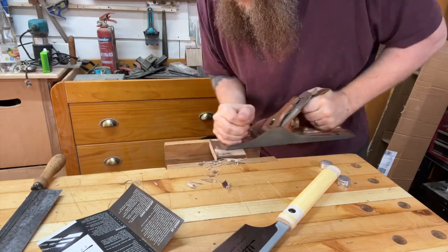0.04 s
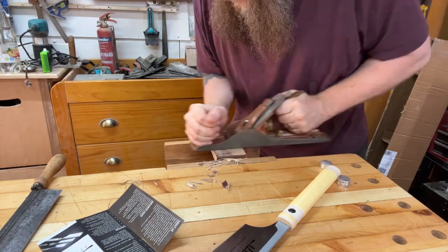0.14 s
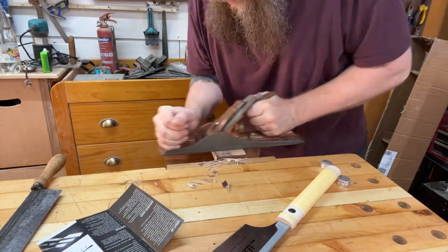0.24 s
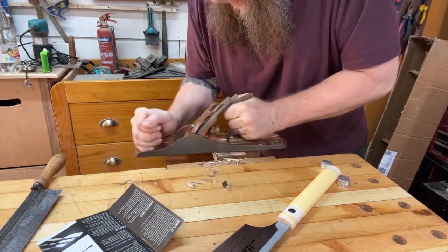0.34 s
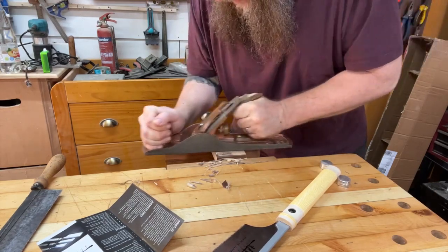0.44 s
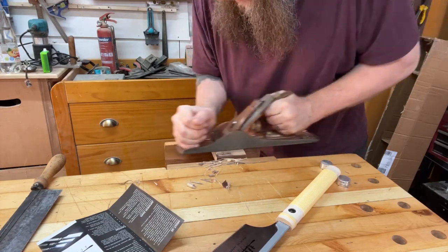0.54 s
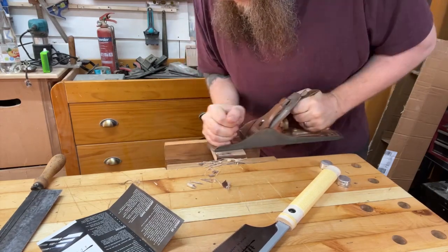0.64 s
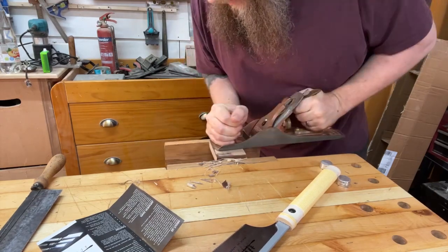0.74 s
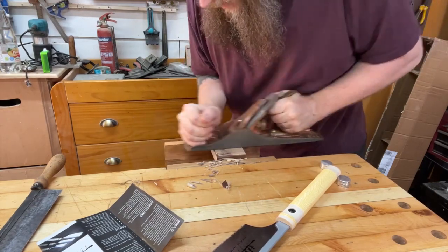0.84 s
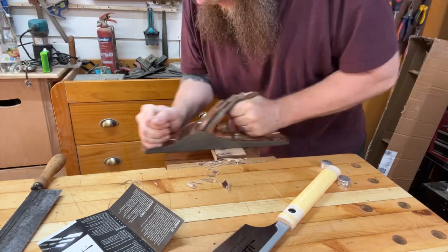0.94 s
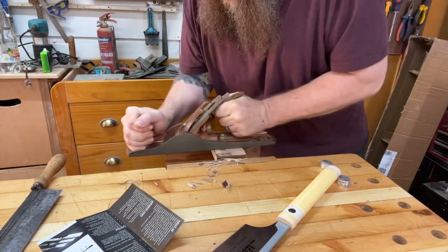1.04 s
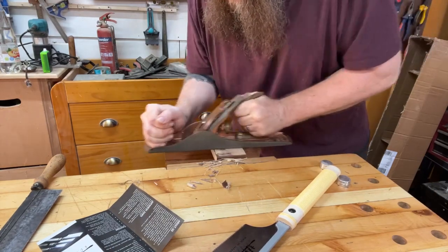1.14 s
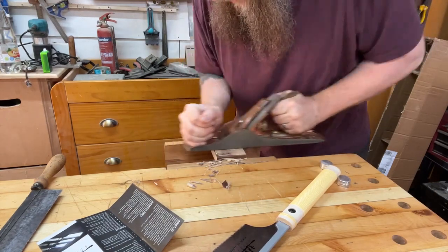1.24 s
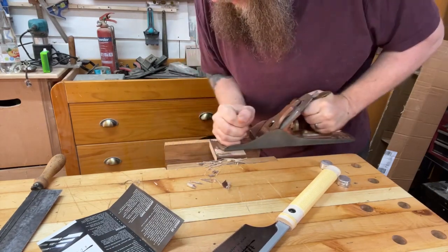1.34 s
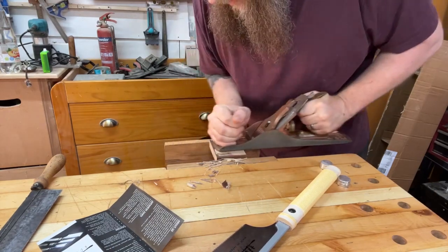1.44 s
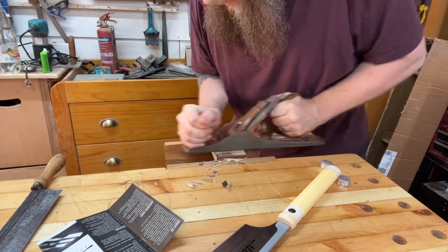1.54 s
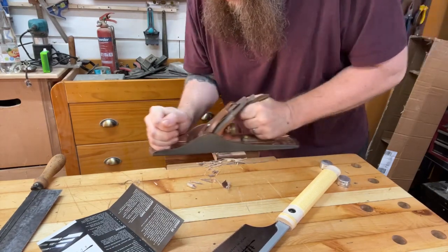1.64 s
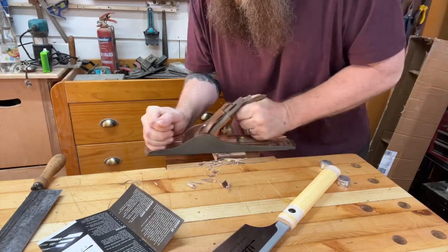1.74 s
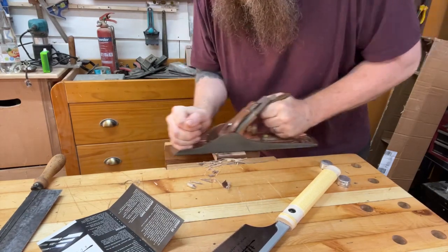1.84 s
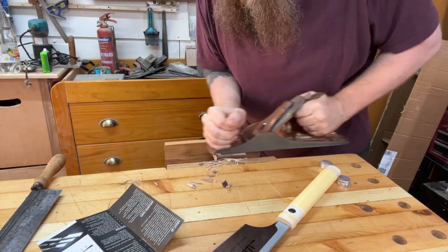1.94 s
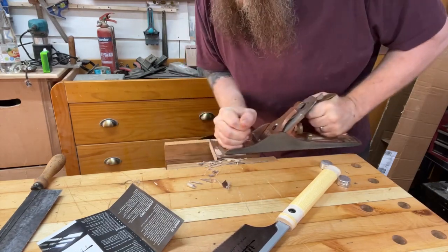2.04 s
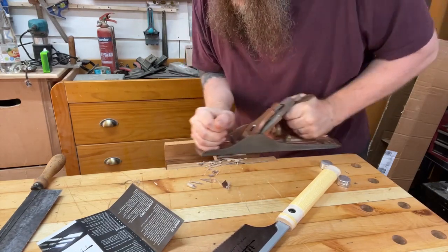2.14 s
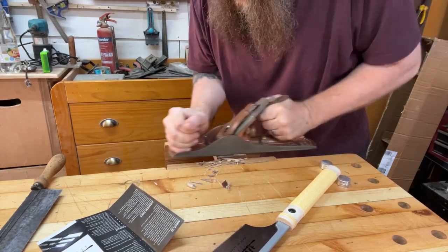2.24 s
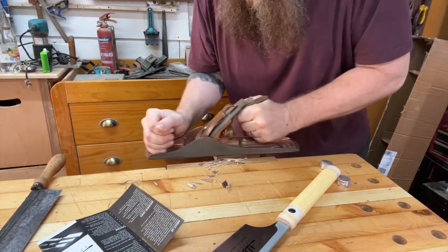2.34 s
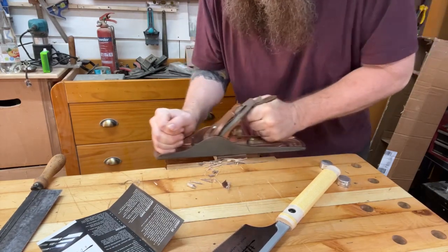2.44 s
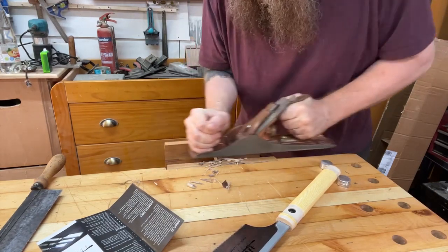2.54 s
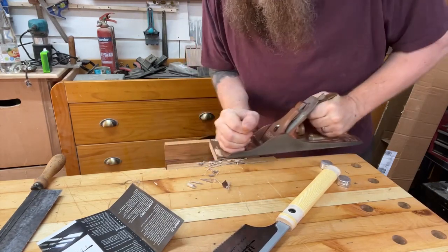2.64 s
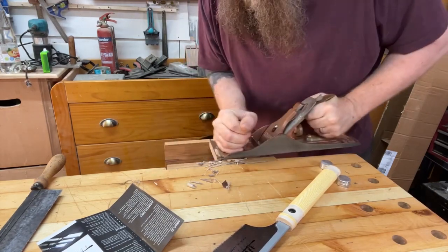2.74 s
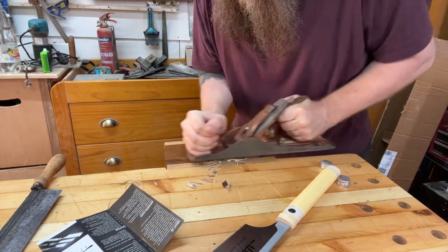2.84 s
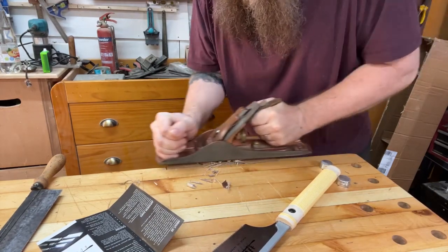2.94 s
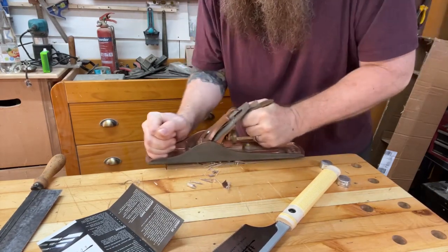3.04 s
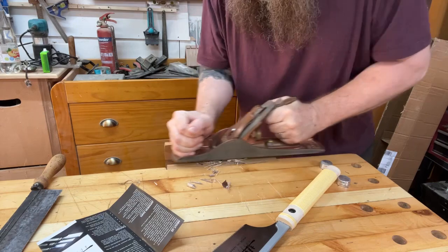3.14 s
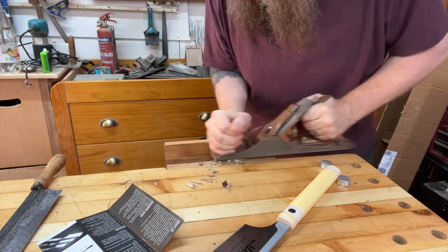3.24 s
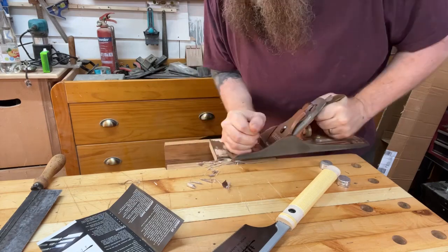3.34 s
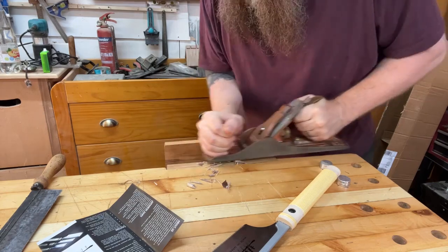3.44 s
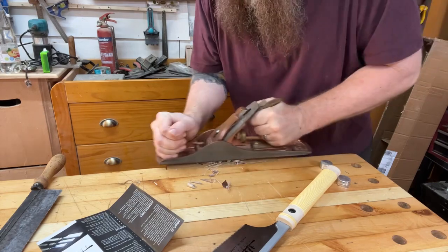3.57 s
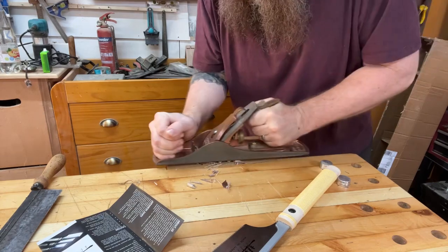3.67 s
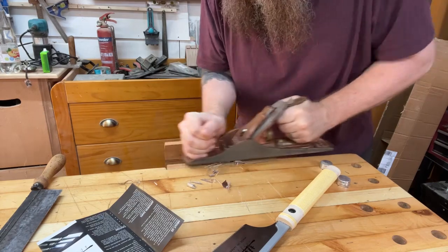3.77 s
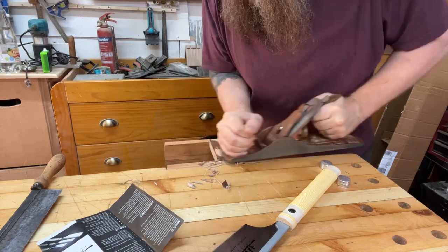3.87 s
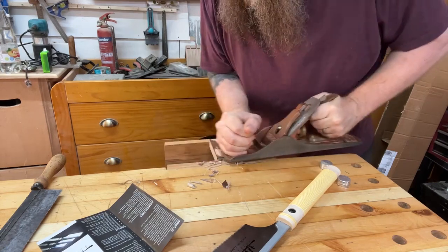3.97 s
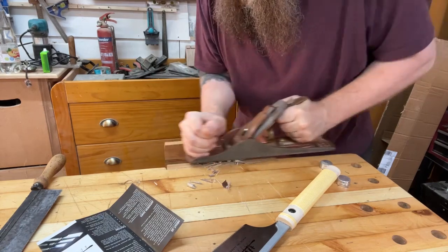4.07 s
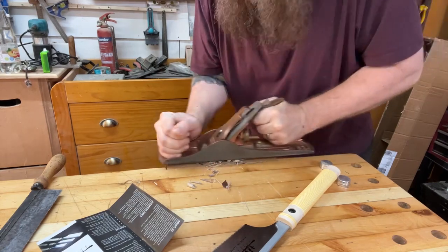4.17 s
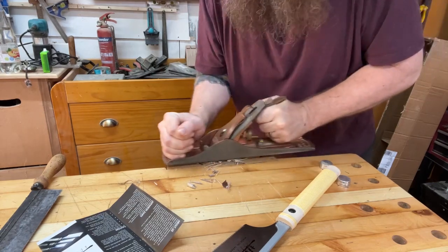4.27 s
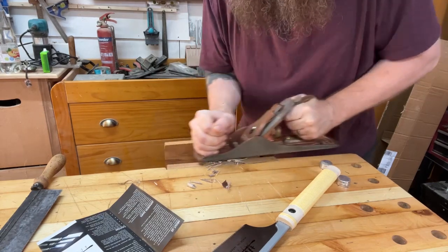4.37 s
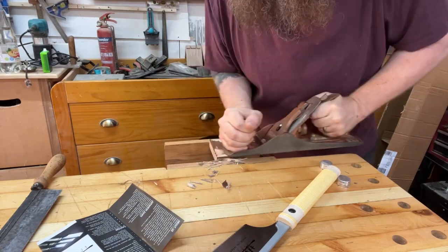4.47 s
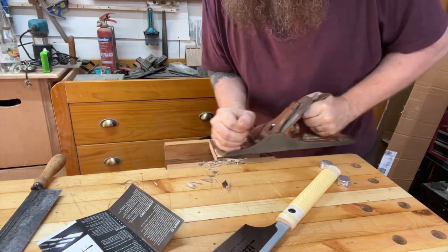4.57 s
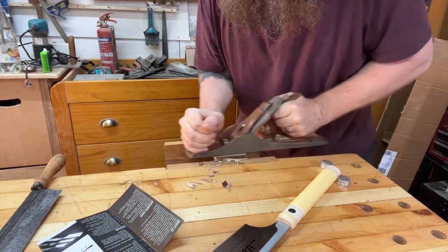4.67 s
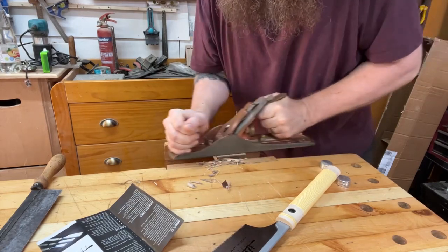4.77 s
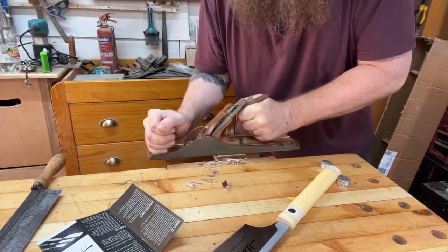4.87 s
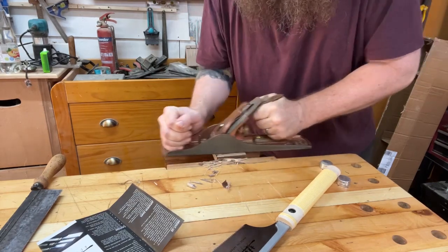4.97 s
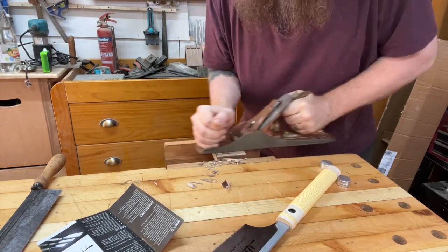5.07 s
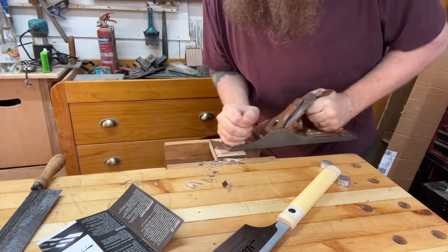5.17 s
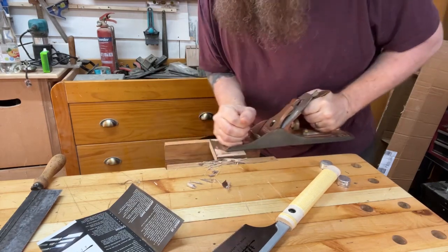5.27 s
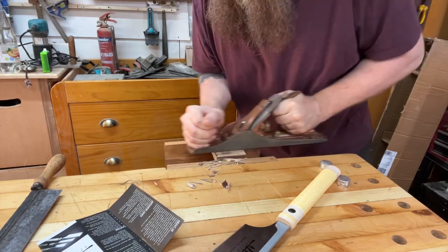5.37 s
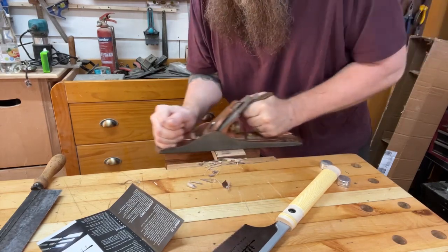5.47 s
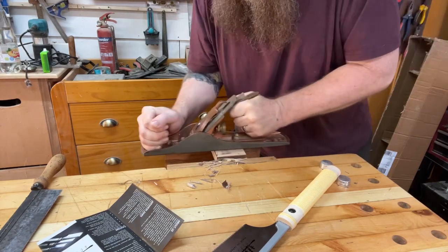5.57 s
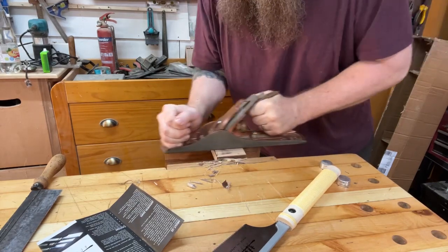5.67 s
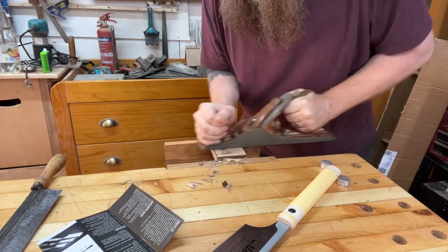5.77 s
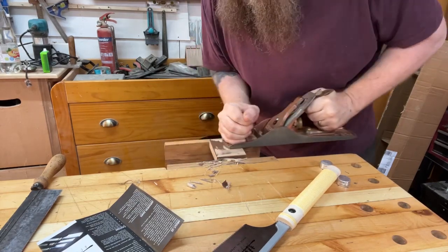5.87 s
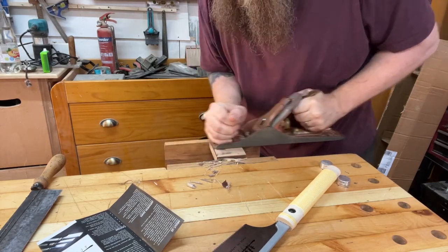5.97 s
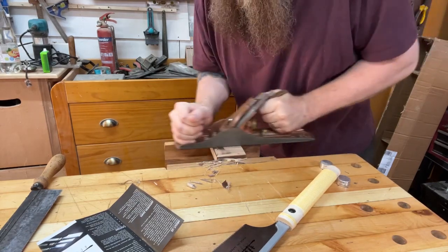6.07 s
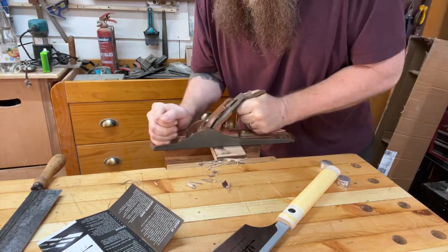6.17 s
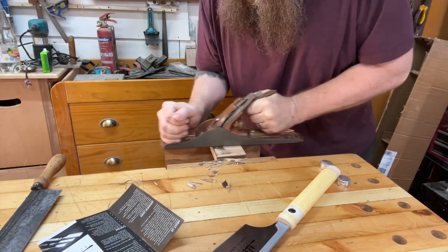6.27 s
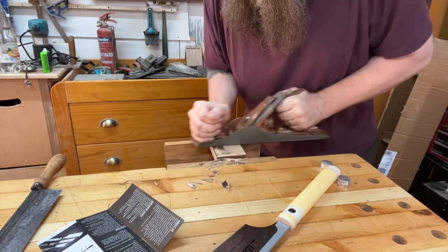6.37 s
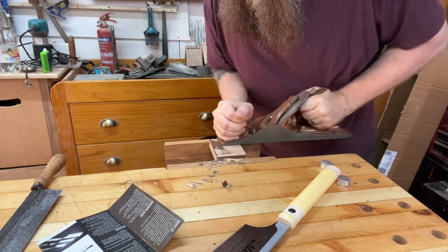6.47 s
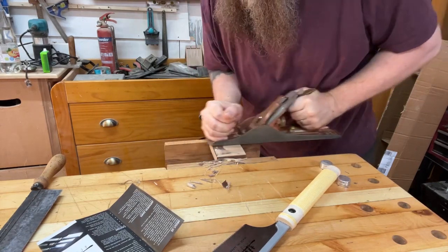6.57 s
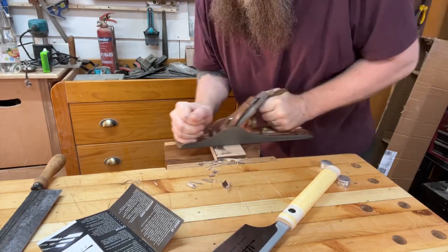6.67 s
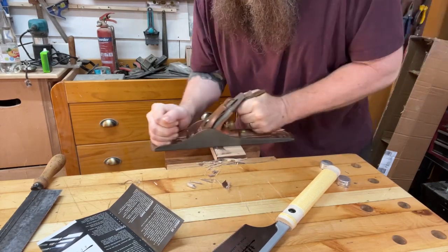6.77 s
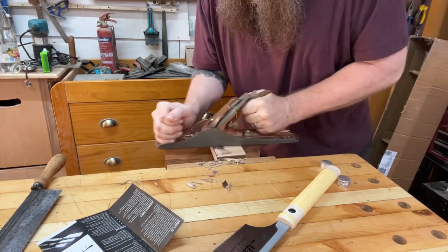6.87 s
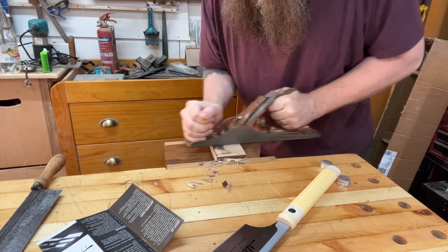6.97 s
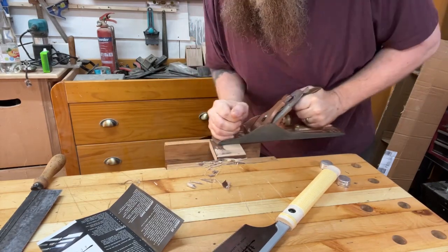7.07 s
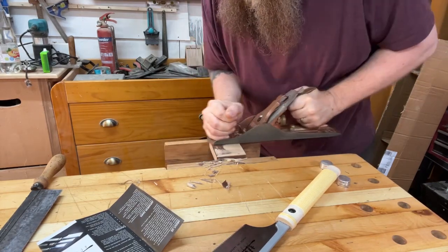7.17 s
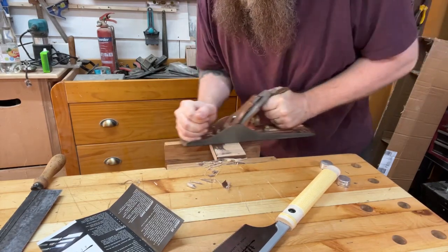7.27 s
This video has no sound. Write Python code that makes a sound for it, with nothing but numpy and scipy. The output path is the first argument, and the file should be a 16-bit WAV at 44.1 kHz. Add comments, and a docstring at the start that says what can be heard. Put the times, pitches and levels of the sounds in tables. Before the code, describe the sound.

A long iron hand plane makes twelve quick strokes over a small wooden block, each a knocking bite and short scrape, with softer return drags.

```python
"""After a dull knock, a long iron hand plane starts twelve quick pushes over a wooden block on a workshop bench.
Each push opens with a blow (noise and a click ringing plane and wood) and tears a shaving (chattering noise).
Each return catches lightly, drags back (softer, drifting noise) and bumps off the edge; the fourth push is hardest,
with a slap after it, and a loud dry tick snaps in the last push. Throughout, the sole slides as coloured noise,
the bench knocks (decaying sines) and rumbles, a small room answers the block and bench, and still air hums low."""
import sys
import numpy as np
from scipy import signal
from scipy.fft import rfft, irfft
from scipy.io import wavfile
from scipy.ndimage import uniform_filter1d, map_coordinates

SR = 44100
rng = np.random.default_rng(int(sys.argv[2]) if len(sys.argv) > 2 else 0)


def dump(signal):
    """Clip the signal to [-1, 1] and save it as 16-bit WAV at the path in sys.argv[1]."""
    limited = np.clip(np.atleast_2d(signal).T, -1, 1)
    pcm = np.round(limited * 32767).astype(np.int16)
    wavfile.write(sys.argv[1], SR, pcm)


N = 322415  # length in samples
TIME = np.arange(N) / SR


def amp(db):
    """Decibels to gain."""
    return 10 ** (np.asarray(db) / 20)


def evened(x):
    """Scales to an rms of one."""
    return x / np.sqrt(np.mean(x ** 2) + 1e-20)


def read(points, hz):
    """Reads a table on a log-frequency axis."""
    f, value = np.transpose(points)
    return np.interp(np.log(hz + 1), np.log(f + 1), value)


def level(points):
    """Gain over the whole scene, gliding in dB between the points of a table."""
    return amp(np.interp(TIME, *np.transpose(points)))


def add(mix, s, sound):
    """Mixes a sound in at time s."""
    part = mix[max(round(s * SR), 0):][:len(sound)]
    part += sound[:len(part)]


def band(x, lo_hz, hi_hz):
    """Causal band-pass."""
    edges = [lo_hz, min(hi_hz, SR / 2 - 1)]
    return signal.sosfilt(signal.butter(N=3, Wn=edges, btype="band", fs=SR, output="sos"), x)


def colour(x, tone, modes=(), size=8192):
    """Passes x through a causal body: a broad spectrum with ringing modes on top."""
    hz = np.fft.rfftfreq(size, 1 / SR)
    ring = 1 + sum(amp(db) / (1 + 2j * (hz - f) / width) for f, width, db in modes)
    log_gain = np.log(amp(read(tone, hz)) * abs(ring))
    circle = np.concatenate([log_gain, log_gain[-2:0:-1]])
    spectrum = np.exp(np.conj(signal.hilbert(circle)))  # minimum phase: the body answers at once
    taps = np.fft.ifft(spectrum).real[:size // 2]
    return signal.oaconvolve(x, taps)[:len(x)]


def wander(rate_hz, count=N):
    """Smooth chance of rms one, changing mostly below the given rate."""
    hz = np.fft.rfftfreq(count, 1 / SR)
    spectrum = rfft(rng.standard_normal(count)) * np.exp(-(hz / rate_hz) ** 2)
    return evened(irfft(spectrum, count))


def grit(grain_db, grain_hz):
    """Friction force: noise that comes in tiny clumps as fibres catch and let go."""
    return evened(rng.standard_normal(N) * amp(grain_db * wander(grain_hz)))


FIRST_TURN_S, LAST_TURN_S = -0.033, 7.64


def turn_times():
    """Between these two, the plane turns round halfway between leaving the block and meeting it again."""
    strokes = sorted(PUSHES + RETURNS)
    halfway = [(last[1] + following[0]) / 2 for last, following in zip(strokes, strokes[1:])]
    return [FIRST_TURN_S, *halfway, LAST_TURN_S]


SWEEP_FALL_OCTAVES = .14  # the block's pitch sinks as the plane passes over it


def travel():
    """Speed of the plane (0 at each turn, 1 mid-sweep) and the pitch of the block, sinking through each stroke."""
    turns = turn_times()
    progress = np.interp(TIME, turns, np.arange(len(turns)))
    pitches = np.array([stroke[-1] for stroke in sorted(PUSHES + RETURNS)])
    hz = pitches[np.minimum(progress.astype(int), len(pitches) - 1)]
    speed = abs(np.sin(np.pi * progress))
    return speed, hz * 2 ** (SWEEP_FALL_OCTAVES * (.5 - progress % 1))


def hollow(x, lift_db, width_hz, ratio=1, glide=0.18):
    """Adds a resonance of sole and block that shifts with the travel of the plane."""
    speed, hz = travel()
    mode_hz = ratio * hz * (1 + glide * (speed - .8))
    spin = np.exp(2j * np.pi * np.cumsum(mode_hz) / SR)
    r = np.exp(-np.pi * width_hz / SR)
    # bring the moving mode down to zero, smooth there, and move it back up
    resonance = 2 * (spin * signal.lfilter([1 - r], [1, -r], x / spin)).real
    return evened(x + amp(lift_db) * resonance)


def shifting(x, patchy_db, size=(7, 25)):
    """The colour of a rub drifts as the point of contact moves over the grain."""
    z = signal.stft(x, nperseg=512, noverlap=384)[2]
    patches = uniform_filter1d(rng.standard_normal(z.shape), size[0], 0)  # smooth across pitch
    patches = uniform_filter1d(patches, size[1], 1)  # and across time
    z = z * amp(patchy_db * evened(patches))
    return evened(signal.istft(z, nperseg=512, noverlap=384)[1][:N])


def scrape(strokes, sound, rasp_change_db, hiss_change_db, rise_s, fall_s, uneven_db):
    """Plays a friction sound while the blade is on the block; its rasp and hiss change steadily across it."""
    rasp, hiss = np.zeros(N), np.zeros(N)
    for start, end, rasp_db, hiss_db in strokes:
        t = np.arange(start - rise_s, end + .06, 1 / SR)
        landing = np.interp(t, [start - rise_s, start + rise_s], [0, 1]) ** 2
        contact = landing * np.exp(-np.maximum(t - end, 0) / fall_s)
        across = np.interp(t, [start, end], [0, 1])
        add(rasp, t[0], contact * amp(rasp_db + rasp_change_db * across))
        add(hiss, t[0], contact * amp(hiss_db + hiss_change_db * across))
    grain = evened(amp(uneven_db * wander(62)))  # hard and soft wood pass under the edge
    return grain * (rasp * evened(band(sound, 56, 3900)) + hiss * evened(band(sound, 4120, 16000)))


# spectrum of the still air: (frequency_hz, relative_level_db)
AIR_TONE = [(15, 0.5), (40, 5), (80, -1.5), (150, -6), (300, -9), (1000, -10.5), (2000, -11.5),
            (4000, -23.5), (8000, -30.5), (16000, -42.5)]


def still_air():
    """Steady noise, strongest in the bass."""
    return amp(-58.5) * evened(colour(rng.standard_normal(N), AIR_TONE))


# decay of the room's tail: (frequency_hz, t60_s)
ROOM = [(100, 0.49), (300, 1), (1000, 0.19), (2000, 0.31), (6000, 0.053), (15000, 0.21)]


def room(x, delay_s=.003, early_db=-11, early_s=0.0019, count=32768):
    """A quick scatter off the bench top, then the short tail of the workshop."""
    t = np.arange(count) / SR
    sparse = rng.random(count) < 4000 / SR  # about 4000 echoes per second
    taps = rng.choice([-1., 1.], count) * sparse * (t > delay_s)
    hz, when, z = signal.stft(taps, SR, nperseg=256)
    decay = amp(-60 * when / read(ROOM, hz)[:, None])
    tail = signal.istft(z * decay, SR, nperseg=256)[1][:count]
    early = taps * np.exp(-t / early_s)
    answer = amp(-12.5) * tail / np.linalg.norm(tail) + amp(early_db) * early / np.linalg.norm(early)
    return x + signal.fftconvolve(x, answer)[:N]


# the louder dull knocks of the bench and the grip: (start_s, level_db, pitch_hz)
KNOCKS = [(.008, -37.5, 354), (.362, -38, 257), (0.611, -38.5, 280), (1.27, -38, 291), (1.573, -37, 244),
          (2.243, -28, 217), (2.678, -41, 636), (3.322, -40.5, 744), (3.465, -49, 743), (3.914, -42, 722),
          (4.086, -28, 738), (4.639, -30, 220), (5.03, -34, 598), (6.005, -25, 251), (7.102, -41, 273),
          (7.233, -27, 287)]
# deep thumps of the bench as it takes the weight: (start_s, level_db)
THUMPS = [(0.678, -47.5), (2.25, -44), (2.919, -46.5), (3.246, -46), (6.427, -32.5), (7.065, -40.5)]
# shavings snapping: (start_s, level_db)
TICKS = [(.175, -24.5), (.3254, -48), (2.311, -48.5), (3.056, -48.5), (3.301, -49.5), (4.30, -55),
         (4.114, -36), (4.364, -41), (4.8104, -50.5), (6.1805, -50.5), (7.2721, -16.5)]
# spectrum of the bench wood, in its knocks and its rumble: (frequency_hz, relative_level_db)
RUMBLE_TONE = [(80, -15), (160, -2.5), (255, 8), (450, -5.5), (630, 1), (900, -4.5), (1500, -18),
               (4000, -40.5), (14000, -62.5)]
# the grip shifts with a faint knock at every turn-round, its pitch scattered around TURN_KNOCK_HZ
TURN_KNOCK_DB, TURN_KNOCK_HZ, TURN_SPREAD_OCTAVES, TURN_LEAD_S = -46.5, 316, 1, .012
BLOW_THUMP_DB, BLOW_THUMP_LEAD_S = -15.5, 0.0035  # every blow also sways the bench; relative to the blow


def bench(knock_s=0.011, rattle=0.74, thump_hz=39, thump_s=0.014, tick_s=0.0022, size=8192):
    """Knocks are decaying sines with wooden noise, thumps swelling low sines, ticks bursts of bright noise."""
    out, t = np.zeros(N), np.arange(size) / SR
    turn_knocks = []
    for s in turn_times()[1:-1]:
        hz = TURN_KNOCK_HZ * 2 ** (TURN_SPREAD_OCTAVES * rng.standard_normal())
        turn_knocks.append((s - TURN_LEAD_S, TURN_KNOCK_DB, hz))
    blow_thumps = [(s - BLOW_THUMP_LEAD_S, db + BLOW_THUMP_DB) for s, _, db, *_ in PUSHES]
    knock_shape = np.exp(-t / knock_s) * (1 - np.exp(-t / 0.0043))
    thump_shape = (t / thump_s) ** 2 * np.exp(2 * (1 - t / thump_s))  # swells, full at thump_s
    for s, db, hz in KNOCKS + turn_knocks:
        wood = evened(colour(rng.standard_normal(size), RUMBLE_TONE))
        add(out, s, amp(db) * (np.sin(2 * np.pi * hz * t) + rattle * wood) * knock_shape)
    for s, db in THUMPS + blow_thumps:
        hz = thump_hz * rng.uniform(0.75, 1.1)  # no two thumps alike
        sway = np.sin(2 * np.pi * hz * t) + 0.37 * evened(band(rng.standard_normal(size), 23, 83.0))
        add(out, s, amp(db) * sway * thump_shape)
    for s, db in TICKS:
        snap = evened(band(rng.standard_normal(size), 2400, 11000))
        add(out, s, amp(db) * snap * np.exp(-t / tick_s))
    return out


# how hard the sole bears on the wood, as the level of its rub: (time_s, level_db)
BEARING = [(0, -46.5), (1, -56.5), (2.3, -44.5), (3.2, -48), (4.2, -50.5), (4.8, -54), (5.7, -54),
           (6.2, -48), (6.9, -54.5), (7.3, -42.5)]
# level of the sole's hiss: (time_s, level_db)
SOLE_HISS = [(0, -57), (1.3, -57.5), (2.3, -56.5), (3.3, -60), (4.3, -59), (5.9, -58), (6.9, -60.5),
             (7.3, -53)]
# level of the bench's rumble: (time_s, level_db)
RUMBLE = [(0, -52.5), (2.2, -60), (2.8, -60.5), (3.6, -69), (4.6, -58), (7.3, -56.5)]
# spectra of the sole's rub and hiss: (frequency_hz, relative_level_db)
RUB_TONE = [(500, -28.5), (1100, -7), (1600, 2), (2300, -0.5), (3000, -6), (3800, -3.5), (4500, -29),
            (6000, -25)]
HISS_TONE = [(3000, -1), (4500, -0.5), (6600, 4.5), (8500, -6.5), (12000, -13), (16000, -75)]


def sole(rub_power=0.78, hiss_power=1.14):
    """Iron slides on wood, louder with speed and still at each turn; the bench rumbles underneath."""
    speed, _ = travel()
    rub = hollow(colour(grit(grain_db=1.5, grain_hz=120), RUB_TONE), lift_db=6.5, width_hz=170)
    rub = hollow(rub, lift_db=1.5, width_hz=160, ratio=1.3, glide=0.18)  # a higher mode glides further in Hz
    hiss = colour(grit(grain_db=2, grain_hz=291), HISS_TONE)
    rumble = evened(colour(grit(grain_db=4.0, grain_hz=35), RUMBLE_TONE))
    slide = level(BEARING) * shifting(rub, patchy_db=5.0) * speed ** rub_power
    slide += level(SOLE_HISS) * shifting(hiss, patchy_db=1.5) * speed ** hiss_power
    return slide + level(RUMBLE) * rumble * np.sqrt(speed)


# returns, the back of the blade dragging over the block; rasp and hiss as the drag starts, bump off the edge,
# pitch of the block: (start_s, end_s, rasp_db, hiss_db, bump_db, pitch_hz)
RETURNS = [(0.53, 0.594, -41.5, -36.5, -65, 1640), (1.247, 1.274, -43.5, -41, -40.5, 1520),
           (1.856, 1.914, -39.5, -37, -51.5, 2290), (2.526, 2.571, -43, -37.5, -55, 2165),
           (3.167, 3.214, -42.5, -43, -37.5, 1678), (3.764, 3.815, -41.5, -43, -49, 1590),
           (4.363, 4.394, -42.5, -47.5, -45.5, 1480), (5.016, 5.073, -49, -39, -68, 2050),
           (5.713, 5.76, -38.5, -34.5, -57, 2124), (6.33, 6.373, -43, -34, -74.5, 2135),
           (6.948, 7.006, -39, -36, -61, 2190)]
# spectrum of the drag: (frequency_hz, relative_level_db)
DRAG_TONE = [(100, -18), (280, 1.5), (900, -10), (1450, 3), (2200, -1.5), (3700, -14), (4400, -25.5),
             (5200, -14), (6300, -1.5), (7400, -8.5), (8700, -11.5), (12000, -16), (16000, -25)]
# resonances with the blade riding lightly backwards: (frequency_hz, width_hz, lift_db)
RIDING = [(623, 90, 10.5), (1235, 99, 15.5), (1582, 19, 15.5), (2700, 120, 14.5), (2980, 120, 15),
          (3797, 57, 23), (5010, 52, 22.5), (5750, 160, -21.5), (7250, 320, 6.5)]
DRAG_RASP_CHANGE_DB, DRAG_HISS_CHANGE_DB = 3, -10.5  # a drag turns duller as it goes


def drags(drift=.02):
    """Going back, the blade rides over the grain with a softer, finer scrape whose resonances drift as it tilts."""
    sound = colour(grit(grain_db=1.5, grain_hz=400), DRAG_TONE, RIDING)
    position = np.cumsum(1 + drift * wander(10))  # reading faster or slower bends the resonances
    sound = map_coordinates(sound, [position], order=3, mode="mirror")
    sound = hollow(sound, lift_db=1, width_hz=200)
    strokes = [(start, end, rasp_db, hiss_db) for start, end, rasp_db, hiss_db, _, _ in RETURNS]
    return scrape(strokes, shifting(sound, patchy_db=0.85), DRAG_RASP_CHANGE_DB, DRAG_HISS_CHANGE_DB,
                  rise_s=0.0057, fall_s=0.0081, uneven_db=2.0)


# spectrum of the cut: (frequency_hz, relative_level_db)
CUT_TONE = [(60, -25.5), (260, -12.5), (450, -13), (750, -4), (1000, -6.5), (1500, -3), (2300, -5),
            (3500, -7), (4200, -15), (5000, -9.5), (7000, -10), (8600, -20), (12000, -20.5), (16000, -31)]
# resonances of plane and block under a push: (frequency_hz, width_hz, lift_db)
PLANE = [(272, 180, 4.5), (370, 24, 2), (627, 42, -3), (700, 36, 7), (798, 33, 0), (1320, 34, -4),
         (1516, 100, -7), (1639, 36, 1), (2004, 130, 8.5), (2533, 310, 7), (2784, 20, -5), (3560, 21, -27),
         (3748, 54, -8.5), (5780, 45, -2), (6530, 63, -8.5), (7420, 350, -1)]
CUT_RASP_CHANGE_DB, CUT_HISS_CHANGE_DB = -5.5, -4.5  # a cut eases from its start to its end


def cuts(chatter_hz=300, unsteady=0.1205):
    """The shaving tears fibre by fibre while the blade chatters unevenly."""
    turns = np.cumsum(chatter_hz * (1 + unsteady * wander(114.8))) / SR
    force = grit(grain_db=-1.0, grain_hz=690) * amp(2.7 * np.cos(2 * np.pi * turns))
    sound = hollow(colour(force, CUT_TONE, PLANE), lift_db=1.5, width_hz=850)
    strokes = [(start, end, rasp_db, hiss_db) for start, end, *_, rasp_db, hiss_db, _ in PUSHES]
    return scrape(strokes, shifting(sound, patchy_db=2.0), CUT_RASP_CHANGE_DB, CUT_HISS_CHANGE_DB,
                  rise_s=0.0018, fall_s=0.0043, uneven_db=3.44)


# spectrum of a blow: (frequency_hz, relative_level_db)
BLOW_TONE = [(50, -14.5), (250, -25), (450, -26), (700, -8.5), (1030, -7.5), (1550, 3), (2300, -9.5),
             (3400, 3), (4050, -18), (5650, -11.5), (7500, -23), (8500, -31.5), (12000, -30), (16000, -29)]
THUD_HZ, THUD_DB, THUD_DB_PER_OCTAVE = 1664, -8.5, -38  # the lower the block rings, the more a blow thuds
THUD_FORCE_DB, THUD_DB_PER_DB = -33.5, 0.04  # and the harder it lands, the more of it goes into the bench


def strike(db, crack_db, ring_db, hz, contact_s=0.0019, crack_s=0.012, crush=0.19,
           focus_width_hz=240, size=4096):
    """The edge hits the block: a sharp push and a moment of crushing fibres ring plane and wood."""
    t = np.arange(size) / SR
    crushing = crush * rng.standard_normal(size) * np.exp(-t / contact_s)
    force = signal.unit_impulse(size) + crushing
    # the point of contact favours some modes
    force = colour(force, [(50, 0.014), (16000, 0.0064)], [(hz, focus_width_hz, ring_db)])
    hit = colour(force, BLOW_TONE, PLANE)
    thud_db = THUD_DB + THUD_DB_PER_OCTAVE * np.log2(hz / THUD_HZ)
    thud_db += THUD_DB_PER_DB * max(db - THUD_FORCE_DB, 0)
    low = amp(thud_db) * evened(band(hit, 40, 1110))
    mid = evened(band(hit, 1160, 3800))
    high = amp(crack_db) * evened(band(hit, 5600, 13000) * np.exp(-t / crack_s))  # the treble dies first
    return amp(db) * (low + mid + high)


# pushes, each a blow and then a shaving; crack relative to the blow, ring of the block, rasp and hiss as the
# cut starts, pitch of the block: (start_s, end_s, blow_db, crack_db, ring_db, rasp_db, hiss_db, pitch_hz)
PUSHES = [(0.1317, 0.179, -31.5, 0, 6, -31, -38.5, 2080), (0.8004, 0.826, -48, -10, 30, -34, -43, 1304),
          (1.491, 1.518, -28.5, -8, 19, -31, -54, 1537),
          (2.1251, 2.168, -18.5, -9.5, 1.5, -33.5, -32.5, 1730),
          (2.799, 2.842, -29.5, -6.5, 6, -29, -36.5, 1800), (3.4424, 3.501, -39, -25, 12, -30, -37, 1610),
          (4.0326, 4.113, -37.5, -19.5, -5, -31.5, -37.5, 1620),
          (4.6162, 4.670, -39, 1.5, -5, -29, -29.5, 2000),
          (5.3408, 5.387, -36.5, -1, 8.5, -29.5, -33.5, 1980),
          (6.0044, 6.026, -22, -6, 3.5, -32.5, -31, 1650), (6.605, 6.653, -40.5, -4, 2.5, -30, -31, 1940),
          (7.2152, 7.278, -35, -9.5, 13, -37.5, -34, 1400)]
# the sole slaps down after the hardest push; crack relative to the slap: (start_s, level_db, crack_db, pitch_hz)
SLAPS = [(2.242, -50, -28, 1880)]
CATCH_S, CATCH_DB, CATCH_CRACK_DB = .007, -16, -6.5  # the edge catches just after a return starts; re its hiss
BUMP_LEAD_S, BUMP_CRACK_DB = .007, -13  # and drops off the block just before it ends
LIGHT_RING_DB = 8  # ring of the block under the lighter contacts


def blows():
    """A push opens with a blow; a return catches lightly on the block and bumps off its far edge."""
    out = np.zeros(N)
    for start, _, db, crack_db, ring_db, _, _, hz in PUSHES:
        add(out, start, strike(db, crack_db, ring_db, hz))
    for start, end, _, hiss_db, bump_db, hz in RETURNS:
        add(out, start + CATCH_S, strike(hiss_db + CATCH_DB, CATCH_CRACK_DB, LIGHT_RING_DB, hz))
        add(out, end - BUMP_LEAD_S, strike(bump_db, BUMP_CRACK_DB, LIGHT_RING_DB, hz))
    for s, db, crack_db, hz in SLAPS:
        add(out, s, strike(db, crack_db, LIGHT_RING_DB, hz))
    return out


def scene():
    """Blade and bench sound in the room; the sole's slide and the still air are left dry."""
    in_room = room(blows() + cuts() + drags() + bench())
    return (in_room + sole() + still_air())[None]


EDGE_HZ = 16200  # top of the band


def record(dry, ceiling=1.0):
    """A soft ceiling rounds off the loudest peaks; a low-pass then limits the band."""
    rounded = ceiling * np.tanh(dry / ceiling)
    low_pass = signal.firwin(301, EDGE_HZ, window=("kaiser", 9), fs=SR)
    return signal.oaconvolve(rounded, low_pass[None], "same")


dry = scene()
out = record(dry)
dump(out)
```